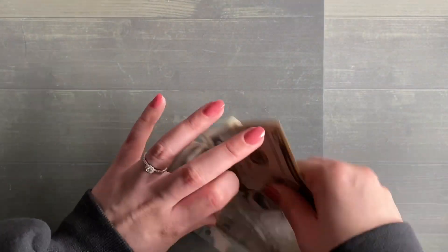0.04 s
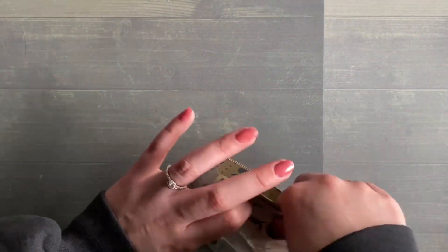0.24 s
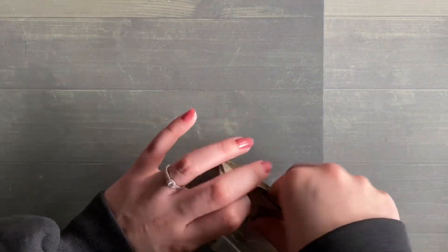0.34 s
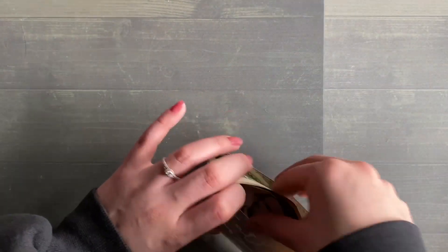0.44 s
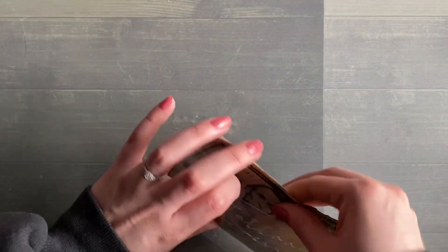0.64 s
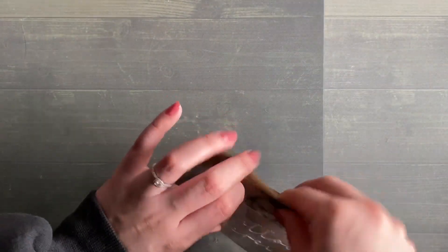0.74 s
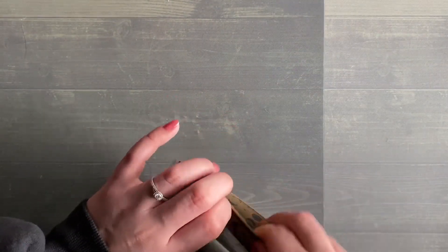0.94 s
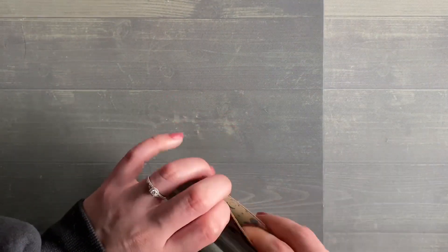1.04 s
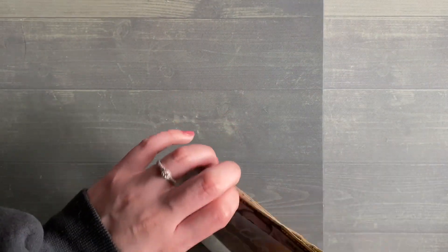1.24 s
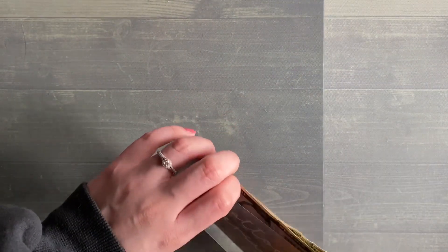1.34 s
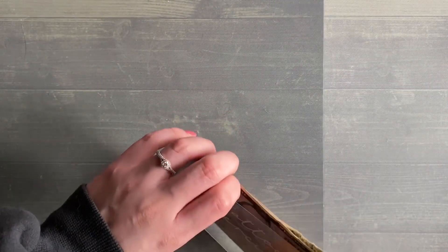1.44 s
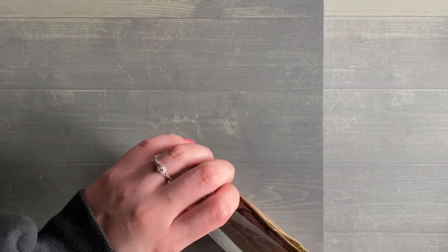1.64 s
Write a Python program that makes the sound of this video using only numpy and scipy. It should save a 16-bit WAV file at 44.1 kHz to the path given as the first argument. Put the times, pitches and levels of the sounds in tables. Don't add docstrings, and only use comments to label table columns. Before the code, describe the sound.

Crinkly paper notes being counted by hand, sliding in short strokes with snaps in a quiet room.

```python
import sys
import numpy as np
from scipy import signal
from scipy.fft import rfft, irfft, next_fast_len
from scipy.io import wavfile
from scipy.ndimage import uniform_filter1d, minimum_filter1d

SR = 44100
rng = np.random.default_rng(int(sys.argv[2]) if len(sys.argv) > 2 else 0)


def dump(signal):
    limited = np.clip(np.atleast_2d(signal).T, -1, 1)
    pcm = np.round(limited * 32767).astype(np.int16)
    wavfile.write(sys.argv[1], SR, pcm)


def boost_factor(decibels):
    exponent = np.asarray(decibels, float) / 20
    return 10 ** exponent


N = 74970

# t/s, level/dB
HUM_LEVEL = [(0, -75.5), (.35, -65.5), (.85, -61.5), (1.25, -70.5), (1.55, -70.5), (1.7, -77)]
# f/Hz, level/dB
ROOM_TONE = [(25, -12), (60, -6), (100, -9.5), (250, -11.5), (400, -13), (1000, -24.5), (5000, -27),
             (16000, -36)]
# t/s, level/dB
STROKES = [
    [(0, -46), (.014, -52), (.03, -44), (.06, -41.5), (.11, -46), (.2, -52.5), (.216, -31), (.24, -42),
     (.27, -49.5), (.308, -52)],
    [(.35, -45), (.41, -47.5), (.45, -51.5), (.53, -46.5), (.595, -48.5), (.605, -64.5), (.655, -65)],
    [(.668, -50), (.69, -42), (.72, -35.5), (.74, -41.5), (.76, -55.5), (.81, -67.5)],
    [(.825, -49.5), (.86, -45.5), (.905, -39.5), (.95, -47), (.97, -43), (.996, -53), (1.01, -48),
     (1.03, -50.5), (1.06, -49.5), (1.15, -61.5)],
    [(1.163, -54.5), (1.168, -48), (1.2, -46), (1.25, -40), (1.28, -40.5), (1.315, -41.5), (1.35, -57),
     (1.405, -76)],
    [(1.45, -62.5), (1.5, -64.5), (1.522, -71), (1.545, -59), (1.58, -72.5), (1.62, -83.5), (1.7, -83)],
]
# t/s, speed (0 slow and dull, 1 fast and bright)
SPEED = [(0, 0.34), (.06, 0.51), (.12, 0.39), (.4, .3), (.53, 0.24), (.62, 0.36), (.668, 0.092),
         (.73, 0.46), (.8, 0.42), (.83, 0.11), (.9, 0.41), (1.05, 0.4), (1.15, 0.45), (1.25, 0.99),
         (1.33, 1), (1.45, 0.72), (1.55, 0.2), (1.7, 1.13)]
# f/Hz, level/dB
SLOW_SHEET = [(120, -26), (600, -8), (800, 1.5), (1150, -2), (2000, -0.7), (3500, -12.5), (7000, -20.5),
              (16000, -20)]
# f/Hz, level/dB
FAST_SLIDE = [(150, -39), (600, -28.5), (820, -11.5), (1150, -14.5), (4500, -4.5), (6200, -0.5),
              (9000, -7.5), (16000, -17.5)]
# f/Hz, width/Hz, level/dB
HAND_MODES = [(849, 150, -5), (1439, 250, -8), (2100, 320, 0)]
# t/s, level/dB against the slide
HAND_OPENING = [(0, -12), (.25, -12), (.45, -10), (.6, -12), (.72, -10), (.85, -9), (1.05, -9), (1.17, -22),
                (1.42, -24), (1.55, -8), (1.7, -20)]
# t/s, peak level/dB, f/Hz, t60/s
BUMPS = [(.004, -55, 170, 0.09), (0.21, -39.5, 207, 0.083), (0.214, -52, 129, 0.053),
         (0.247, -53, 130, 0.069), (0.744, -54.5, 153, 0.13), (0.831, -57, 152, 0.058),
         (0.937, -47.5, 475, 0.034), (0.947, -64, 80, 0.12), (1.005, -52, 127.2, 0.21),
         (1.045, -59.5, 170, 0.21)]
# f/Hz, level/dB
PUFF_COLOUR = [(30, -25), (110, -0.5), (250, -10), (500, -7.5), (900, -33.5)]
# t/s, peak level/dB
TICKS = [(.0178, -31), (.134, -32.5), (0.2074, -25.5), (.2135, -32), (.3125, -39), (.3405, -36),
         (.592, -41), (.638, -56), (0.823, -39.5), (.932, -35), (1, -32), (1.168, -41)]
# f/Hz, level/dB
TICK_COLOUR = [(2000, -25.5), (5500, -6), (9000, 3.5), (13000, -0.5), (16500, -6.5)]
# t/s, peak level/dB, ring f/Hz, crack level/dB against the ring, ring t60/s
SNAPS = [(.018, -33, 1890, 0, 0.01), (0.094, -39, 1010, 8.5, 0.016), (.227, -32, 3200, -8, .012),
         (.232, -32, 1750, -12, 0.024), (0.289, -34, 2060, -4, 0.01), (0.3125, -33.5, 5300, -3, 0.01),
         (.315, -38, 1900, -15, .012), (0.361, -37, 2220, -6, 0.02), (.433, -31.5, 1806, -32, 0.011),
         (0.666, -37, 1484, -6, 0.032), (0.684, -31, 2150, 1, .012), (.712, -33.5, 1040, -23, 0.012),
         (.722, -33, 2110, -17, .012), (.734, -35.5, 1510, -6, 0.013), (.822, -46, 2890, 12, 0.023),
         (.9255, -38, 826, -21, 0.05), (.9315, -39, 2100, 1, .012), (.933, -32.5, 750, -10, 0.023),
         (.9375, -35.5, 698, -15, 0.032), (.9845, -36.5, 1860, -20, .02), (.992, -37.5, 2120, -8, 0.034),
         (1.005, -34, 786, -30, 0.025), (1.168, -41.5, 3070, -0.5, 0.014)]
# ratio to the ring, level/dB
PARTNERS = [(.55, -16), (1.32, -11), (1.95, -13)]
# f/Hz, level/dB
CRACK_COLOUR = [(500, -13), (2000, 3.5), (5500, -7), (8000, -10.5), (11000, -18.5), (16000, -27.5)]
# f/Hz, level/dB, t60/s
FOLDS = [
    ((.1336, -27, 4.3), [(1070, -17.5, 0.011), (2300, -10.5, .008), (3940, 0, 0.0057), (4780, -9.5, .007), (5460, -1.5, .006), (8420, -4, .004), (11300, -2, 0.0033)]),
    ((.2065, -12.5, 3), [(800, -13, .012), (1100, -13, .01), (1660, -1, .016), (2354, 0, 0.0045), (3120, -1.5, .005), (3750, -8, .005), (4410, -3.5, .005), (5760, -5.5, 0.0039), (6350, -10.5, 0.0045), (8900, -8, 0.0042)]),
    ((.2132, -15, 2.6), [(690, -14, .025), (1020, -13, 0.023), (1454, -4.5, 0.021), (1777, -1, 0.025), (2150, -5.5, 0.02), (3200, -3, .012), (4445, -3.5, .016), (5640, -7.5, 0.011)]),
    ((.3401, -17, 2.13), [(890, -25.5, 0.018), (2110, 1.5, .009), (3180, -21, 0.011), (3927, -13.5, 0.015), (5100, -18, .005)]),
    ((.9995, -29.5, 5), [(1990, 0, 0.0098), (2800, -12.5, 0.011), (4040, -3.5, 0.011), (6250, -17, .01)]),
    ((1.1015, -35, 1.73), [(980, -2.5, 0.01), (1580, 0, .008), (2300, -6.5, 0.009), (3440, -22, .008), (4790, -18, .006)]),
]
# f/Hz, left lead/rad
STEREO_LEAD = [(200, 0), (450, 1.1), (800, .3), (1650, 0), (4100, .6), (5150, 0), (7280, 3.14), (10600, 6.28),
               (13500, 9.42), (16500, 12.5)]
# f/Hz, left over right level/dB
STEREO_LEAN = [(150, -.5), (450, -.7), (740, -2.5), (1500, -.1), (3300, -1.6), (4500, -2.5), (5300, 0)]
# f/Hz, share unrelated between the channels
STEREO_SCATTER = [(200, .05), (350, 0.96), (700, .15), (1500, 0.11), (4000, 0.75), (5200, 0.13),
                  (16000, 0.22)]
# f/Hz, level/dB
WEAK_SIDE = [(1000, -30), (1500, -15), (5000, -14), (7000, -6), (10500, -5), (13500, -2.5)]


def read(points, hz):
    f, v = np.transpose(points)
    return np.interp(np.log(hz + 1), np.log(f + 1), v)


def curve(points, x):
    return np.interp(x, *np.transpose(points))


def evened(x):
    return x / np.sqrt(np.mean(abs(x) ** 2) + 1e-20)


def colour(x, points):
    return irfft(rfft(x) * boost_factor(read(points, np.fft.rfftfreq(len(x), 1 / SR))), len(x))


def coloured_noise(t, points):
    return evened(colour(rng.standard_normal(len(t)), points))


def add(mix, s, sound):
    part = mix[round(s * SR):][:len(sound)]
    part += sound[:len(part)]


def swell(t, rise):
    return np.sin(np.pi / 2 * np.minimum(t / rise, 1)) ** 2


def ring(hz, t60, rise, t, turn=0, sag=0, sag_s=1):
    turns = hz * (t + sag * sag_s * (1 - np.exp(-t / sag_s))) + turn
    return swell(t, rise) * boost_factor(-60 * t / t60) * np.sin(2 * np.pi * turns)


def background():
    hum_hz, width_hz, sine_share = 180, 14, .75
    tone_db, tone_follow = -71, .7
    t = np.arange(N) / SR
    f = np.fft.rfftfreq(N, 1 / SR)
    fuzz = evened(irfft(rfft(rng.standard_normal(N)) / (1 + ((f - hum_hz) / width_hz) ** 2), N))
    sine = np.sqrt(2) * np.sin(2 * np.pi * hum_hz * t)
    hum = sine_share * sine + (1 - sine_share) * fuzz
    hum_db = curve(HUM_LEVEL, t)
    level = tone_db + tone_follow * (hum_db - hum_db.mean())
    return hum * boost_factor(hum_db) + coloured_noise(t, ROOM_TONE) * boost_factor(level)


def cupped_hands(drive):
    wander = .07
    out = np.zeros(N)
    for hz, width, db in HAND_MODES:
        noise = rng.standard_normal(N)
        drift = evened(uniform_filter1d(uniform_filter1d(noise, size=2500), size=2500))
        turn = np.exp(2j * np.pi * np.cumsum(hz * (1 + wander * drift)) / SR)
        r = np.exp(-np.pi * width / SR)
        mode = turn * signal.lfilter([1], [1, -2 * r, r * r], drive / turn)
        out += boost_factor(db) * evened(mode.real)
    return out * boost_factor(curve(HAND_OPENING, np.arange(N) / SR))


def rub():
    grains_per_s, spread_db, largest, grain_share = 1500, 4, 3, .33
    grain_decay_s, patch_db, flicker_db = .00055, -1, 2
    size = boost_factor(spread_db * np.minimum(rng.exponential(1, N), largest))
    slips = size * (rng.random(N) < grains_per_s / SR)
    envelope = signal.lfilter([1], [1, -np.exp(-1 / (grain_decay_s * SR))], slips)
    grains = evened(envelope * rng.standard_normal(N))
    drive = grain_share * grains + (1 - grain_share) * rng.standard_normal(N)

    hz, ft, z = signal.stft(drive, SR, nperseg=256, noverlap=192)
    noise = rng.standard_normal(z.shape)
    patch = evened(uniform_filter1d(uniform_filter1d(noise, size=3, axis=0), size=8, axis=1))
    flicker = evened(uniform_filter1d(rng.standard_normal(len(ft)), size=4))
    speed = np.clip(curve(SPEED, ft), 0, 1.2)
    shape = boost_factor(np.outer(read(SLOW_SHEET, hz), 1 - speed) + np.outer(read(FAST_SLIDE, hz), speed))
    shape = shape / np.sqrt((shape ** 2).mean(0))
    z = z * shape * boost_factor(patch_db * patch + flicker_db * flicker)
    slide = signal.istft(z, SR, nperseg=256, noverlap=192)[1][:N]
    pressure_db = curve(np.concatenate(STROKES), np.arange(N) / SR)
    return evened(evened(slide) + cupped_hands(drive)) * boost_factor(pressure_db)


def bumps():
    rise_s, sag, sag_s, puff_share = .008, .35, .015, .8
    out, t = np.zeros(N), np.arange(8192) / SR
    for s, db, hz, t60 in BUMPS:
        swing = ring(hz / (1 + sag / 2), t60, rise_s, t, 0, sag, sag_s)
        puff = coloured_noise(t, PUFF_COLOUR) * np.minimum(t / rise_s, 1) * boost_factor(-60 * t / t60)
        add(out, s, 2 * boost_factor(db) * (swing + puff_share * puff))
    return out


def ticks():
    rise_s, t60 = .0005, .007
    out, t = np.zeros(N), np.arange(1024) / SR
    for s, db in TICKS:
        envelope = boost_factor(db - 60 * t / t60) * np.minimum(t / rise_s, 1)
        add(out, s, envelope * coloured_noise(t, TICK_COLOUR))
    return out


def snaps():
    rise_s, crack_t60, sag, sag_s = .00093, .0089, .2, .00062
    out, t = np.zeros(N), np.arange(2048) / SR
    for s, db, hz, crack_db, t60 in SNAPS:
        body = ring(hz, t60, rise_s, t, 0, sag, sag_s)
        for ratio, partner_db in PARTNERS:
            body += boost_factor(partner_db) * ring(hz * ratio, t60, rise_s, t, rng.random())
        envelope = np.minimum(t / rise_s, 1) * boost_factor(-60 * t / crack_t60)
        crack = coloured_noise(t, CRACK_COLOUR) * envelope
        add(out, s, boost_factor(db) * (body / abs(body).max() + boost_factor(crack_db) * crack))
    return out


def folds():
    out, t = np.zeros(N), np.arange(2048) / SR
    for (s, peak_db, turns), modes in FOLDS:
        for hz, db, t60 in modes:
            rise = turns / hz
            envelope = swell(t, rise) * boost_factor(-60 * np.maximum(t - rise, 0) / t60)
            add(out, s, boost_factor(peak_db + db) * envelope * np.sin(2 * np.pi * (hz * t + rng.random())))
    return out


def room(x):
    level_db, t60, rise_s = -20, .08, .015
    t = np.arange(8000) / SR
    tail = rng.standard_normal(len(t)) * boost_factor(-60 * t / t60) * np.minimum(t / rise_s, 1)
    return boost_factor(level_db) * signal.fftconvolve(x, tail / np.linalg.norm(tail))[:N]


def scene():
    paper, edge = rub() + snaps() + folds(), ticks()
    centre = paper + room(paper + edge) + bumps() + background()
    return np.array([centre + edge, centre + np.roll(edge, 3)])


def spread(x):
    f, _, z = signal.stft(x.mean(0), SR, nperseg=256, noverlap=192)
    a, b = uniform_filter1d(rng.standard_normal((z.shape[1], len(f), 2)), size=4, axis=0).T
    scatter = z * evened(a + 1j * b) * read(STEREO_SCATTER, f)[:, None]
    own = signal.istft(scatter, SR, nperseg=256, noverlap=192)[1][:N]
    size = next_fast_len(N + 4096)
    f = np.fft.rfftfreq(size, 1 / SR)
    half = np.exp(.5j * curve(STEREO_LEAD, f)) * boost_factor(.5 * read(STEREO_LEAN, f))
    return irfft(rfft([x[0] + own, x[1] - own], size) * np.array([half, 1 / half]), size)[:, :N]


def thin(pair):
    steady_top_hz, click_top_hz, click_crest_db, waver_db = 15900, 16600, 7.2, 2.2
    frame = dict(nperseg=2048, noverlap=1024, window="cosine")
    f, t, z = signal.stft([pair[0] + pair[1], pair[0] - pair[1]], SR, **frame)
    band = np.arange(len(f)) // 32
    power = np.array([[np.bincount(band, p) for p in abs(c.T) ** 2] for c in z])
    power = power[:, :, band].transpose(0, 2, 1) + 1e-30
    noise = rng.standard_normal((len(t), band[-1] + 1))
    waver = waver_db * evened(uniform_filter1d(noise, size=3, axis=0)).T[band]
    limit = boost_factor(2 * (read(WEAK_SIDE, f)[:, None] + waver))
    drop = (power < power[::-1] * limit) | (f[:, None] > steady_top_hz)

    fizz = uniform_filter1d(np.diff(pair[0], 2, prepend=[0, 0]) ** 2, size=64)
    jump = -minimum_filter1d(-fizz / (uniform_filter1d(fizz, size=1500) + 1e-20), size=500)
    click = uniform_filter1d(1. * (jump > boost_factor(2 * click_crest_db)), size=128)
    keep = np.array([~drop, drop & (f[:, None] < click_top_hz)])
    kept, rest = signal.istft(z * keep, SR, **frame)[1][..., :N]
    m, s = kept + click * rest
    return np.array([m + s, m - s]) / 2


def low_pass(x):
    return signal.sosfilt(signal.butter(12, 16800, fs=SR, output="sos"), x)


def record(dry):
    low_cut_hz = 52
    cut = signal.lfilter(*signal.butter(2, low_cut_hz, "high", fs=SR), dry)
    mix = thin(spread(cut))
    return low_pass(mix)


dry = scene()
out = record(dry)
dump(out)
```